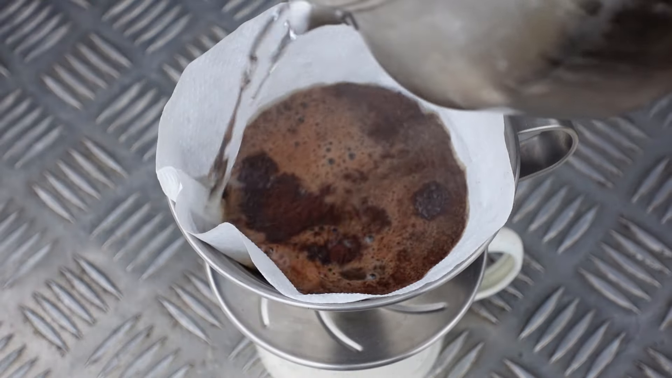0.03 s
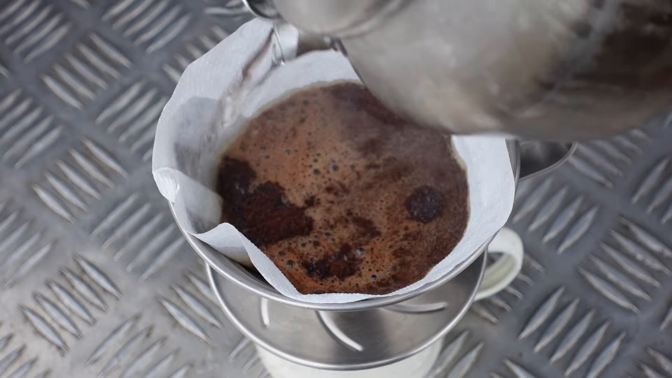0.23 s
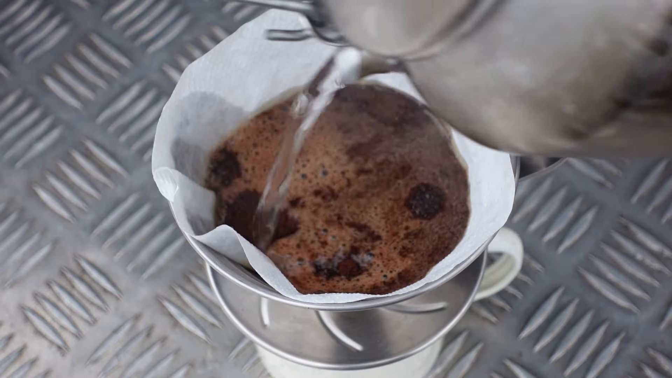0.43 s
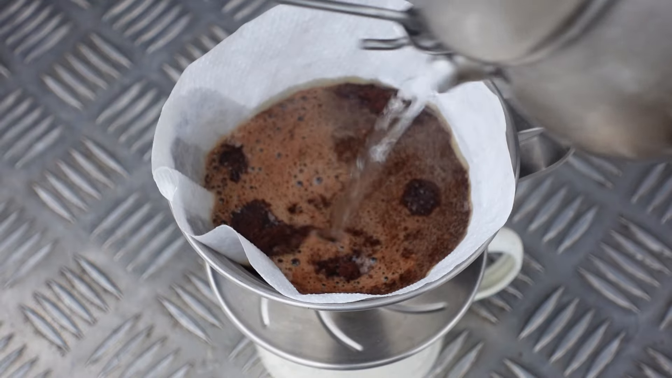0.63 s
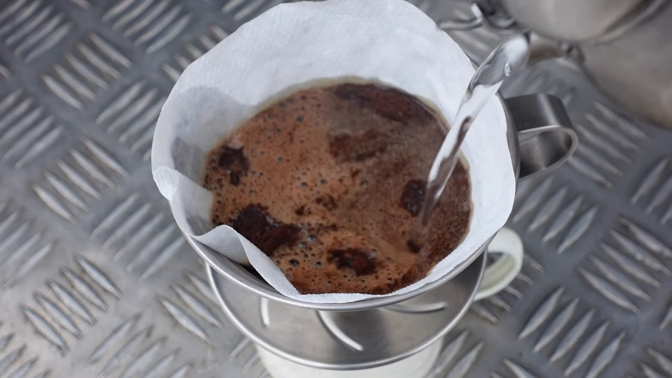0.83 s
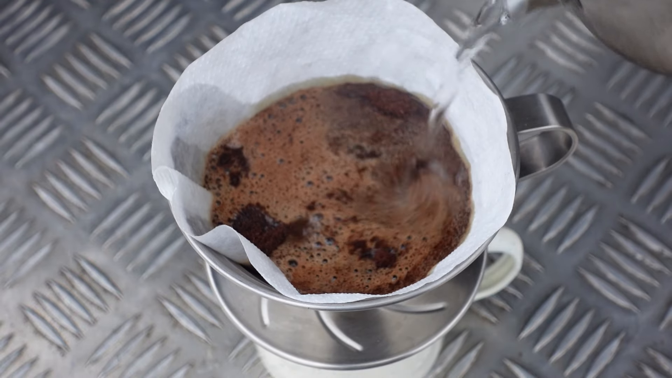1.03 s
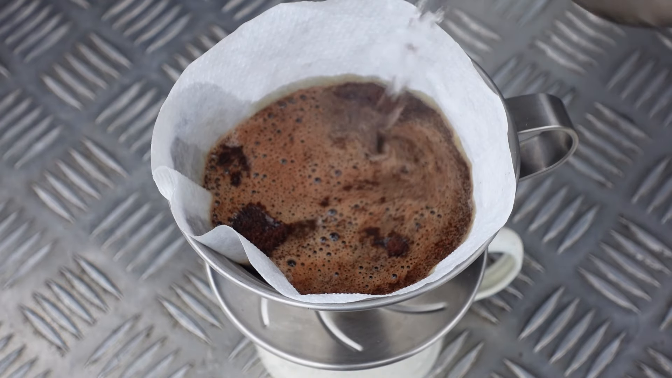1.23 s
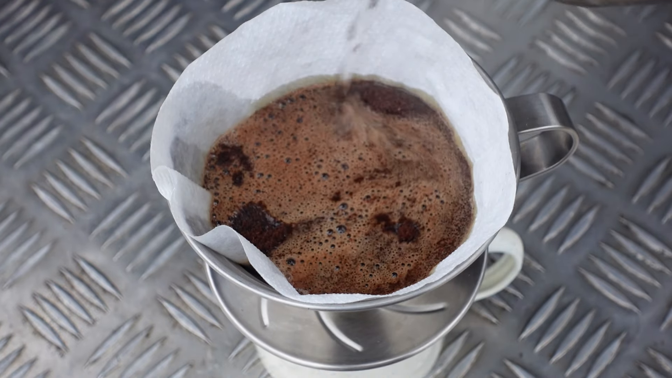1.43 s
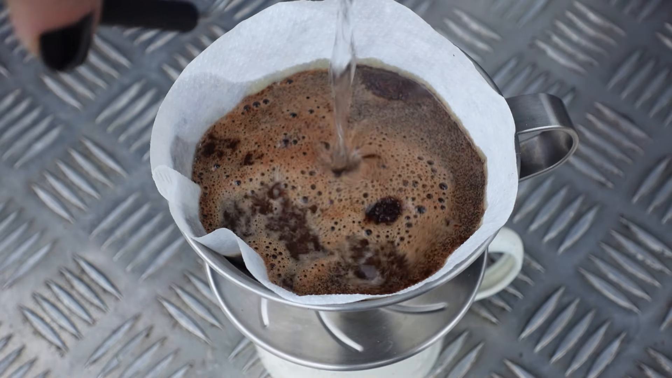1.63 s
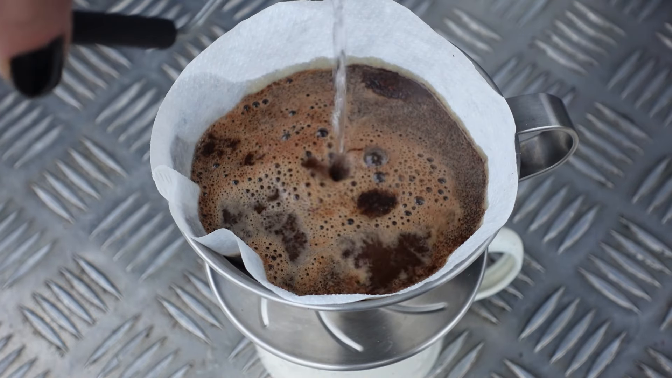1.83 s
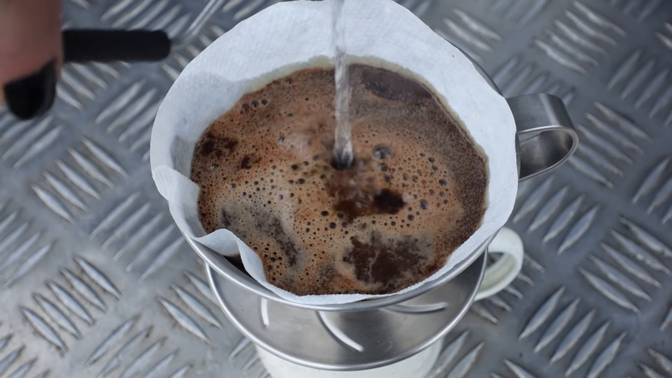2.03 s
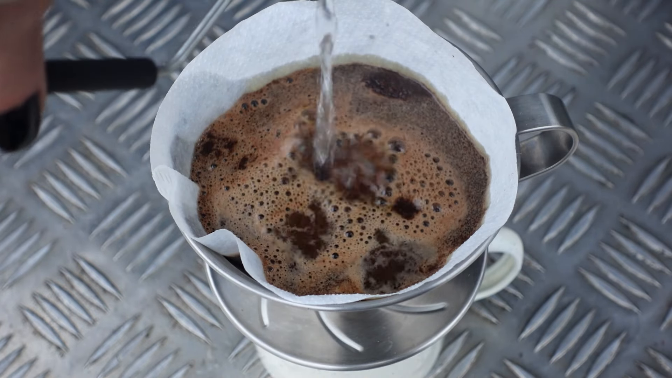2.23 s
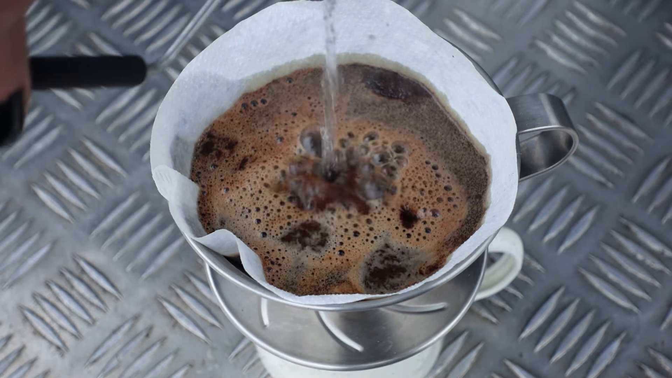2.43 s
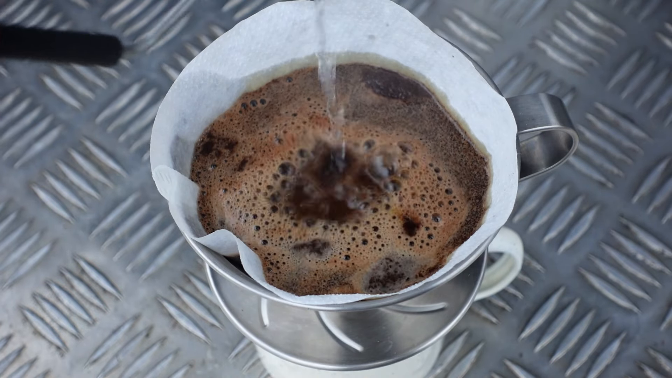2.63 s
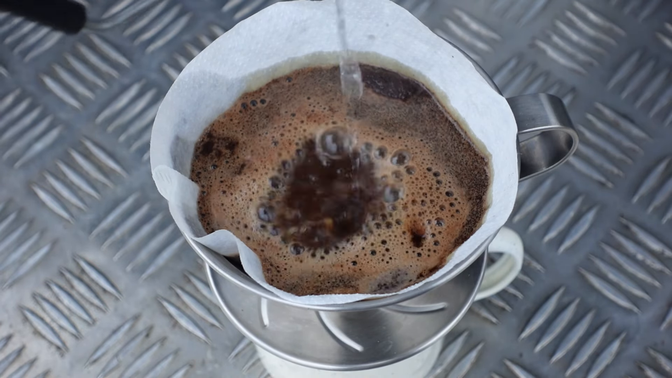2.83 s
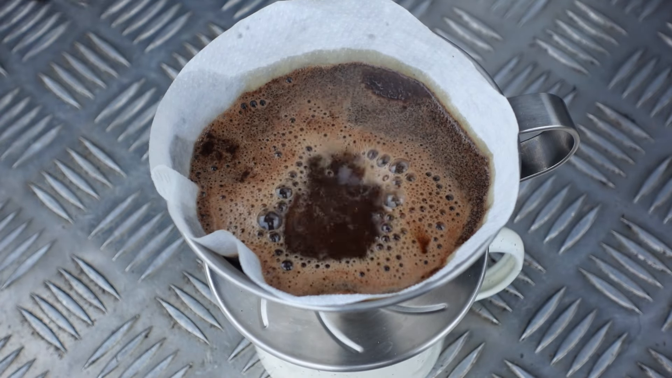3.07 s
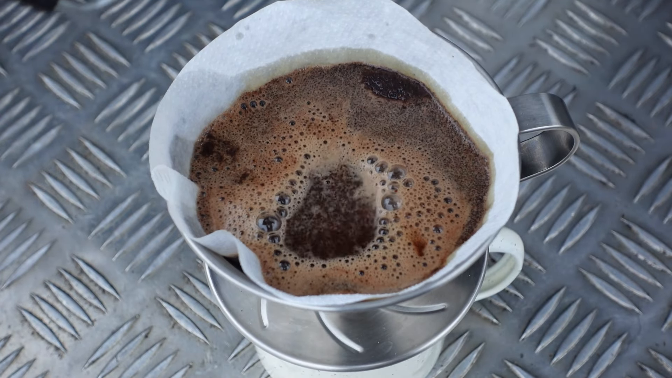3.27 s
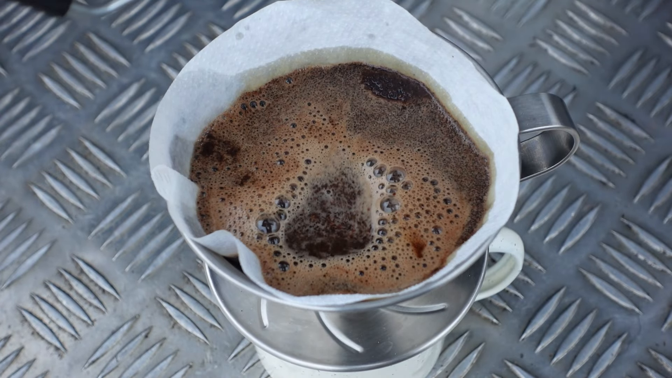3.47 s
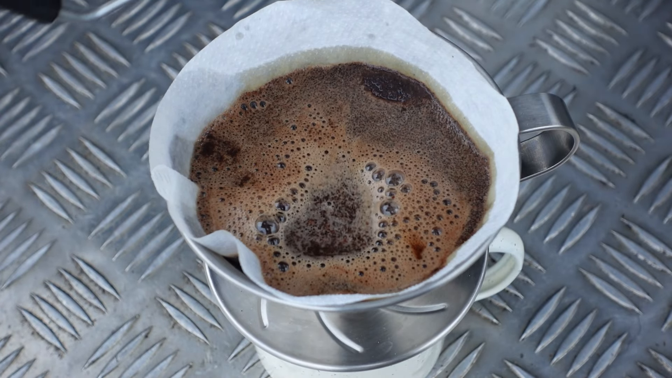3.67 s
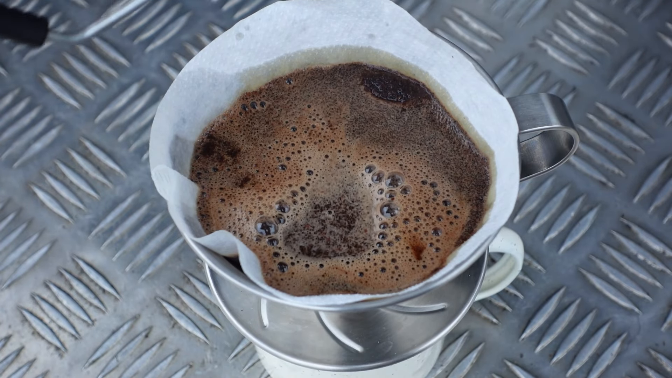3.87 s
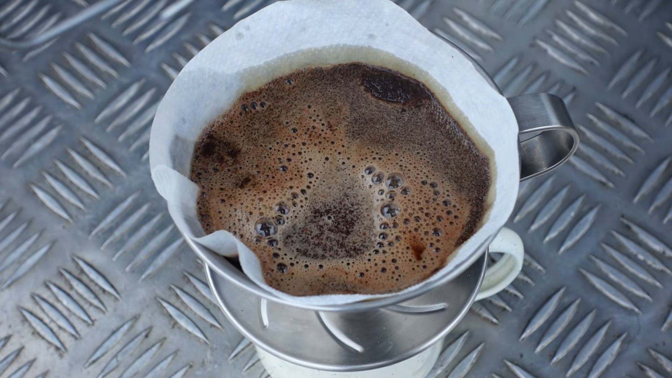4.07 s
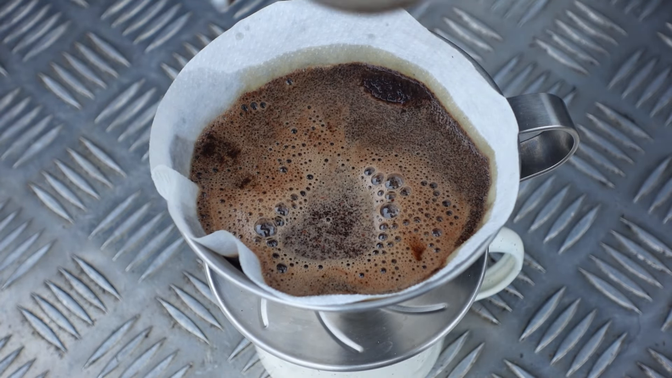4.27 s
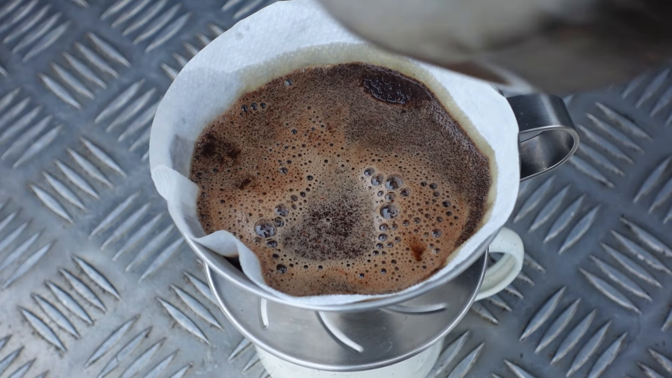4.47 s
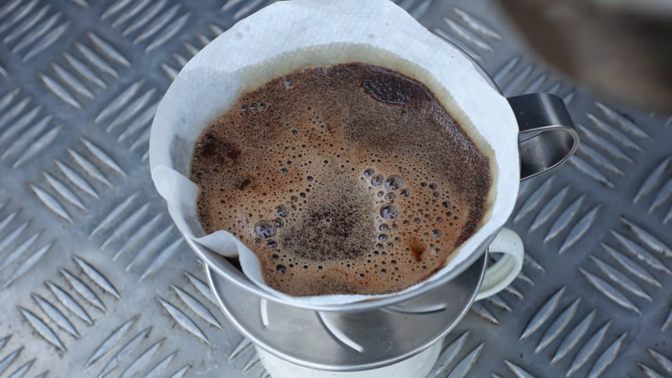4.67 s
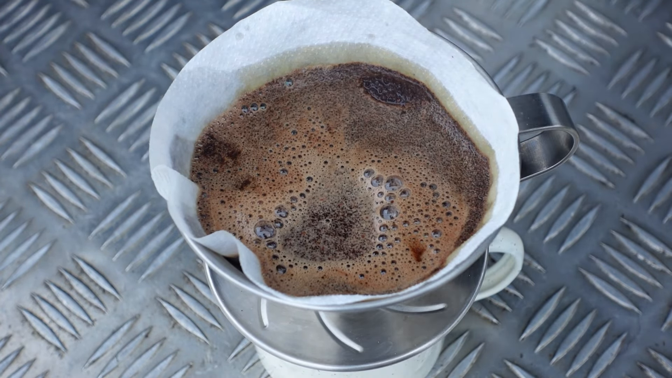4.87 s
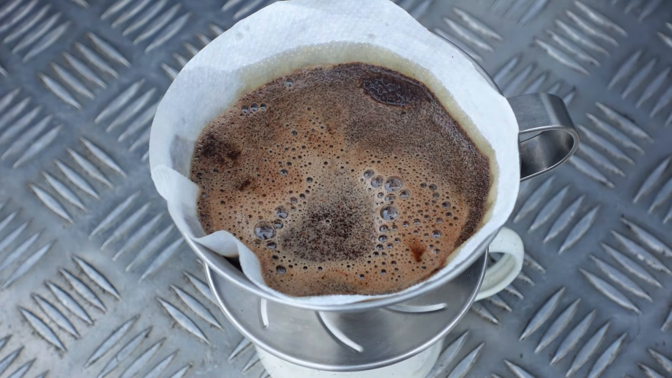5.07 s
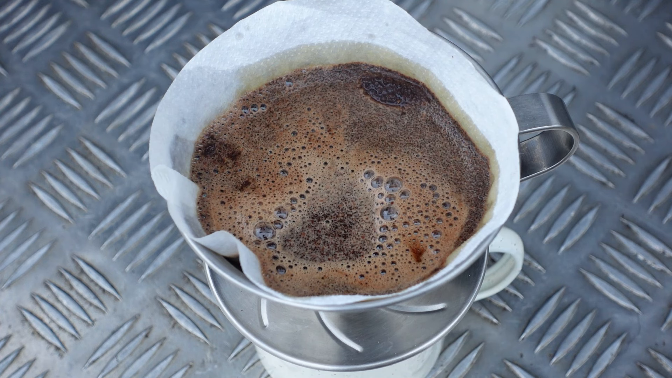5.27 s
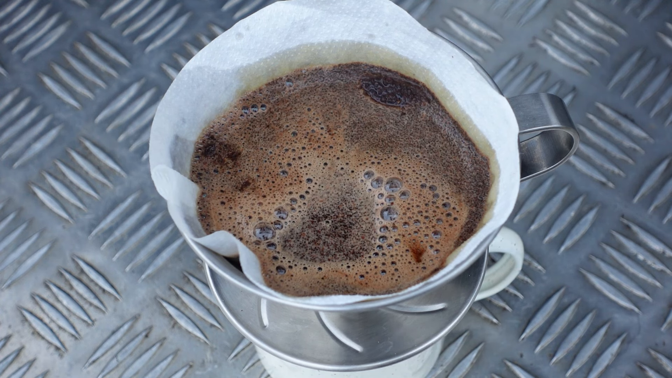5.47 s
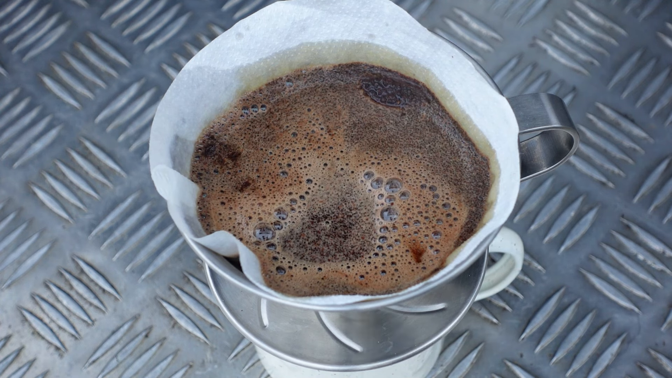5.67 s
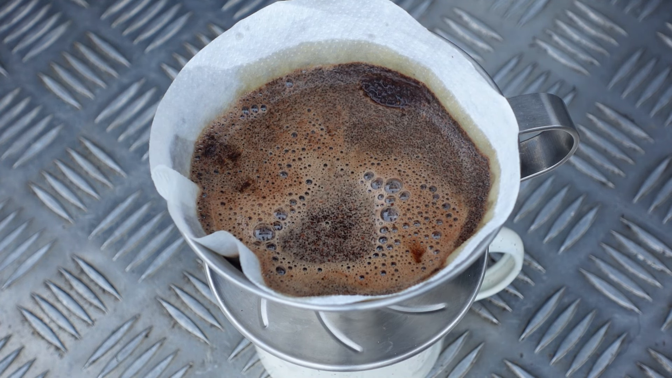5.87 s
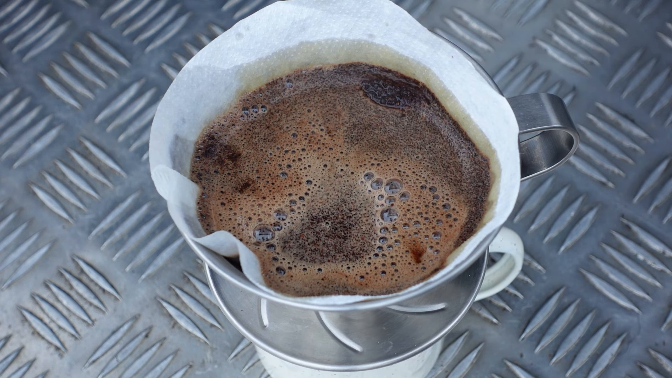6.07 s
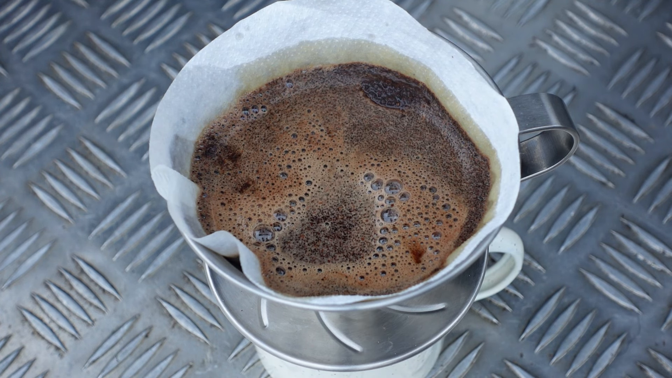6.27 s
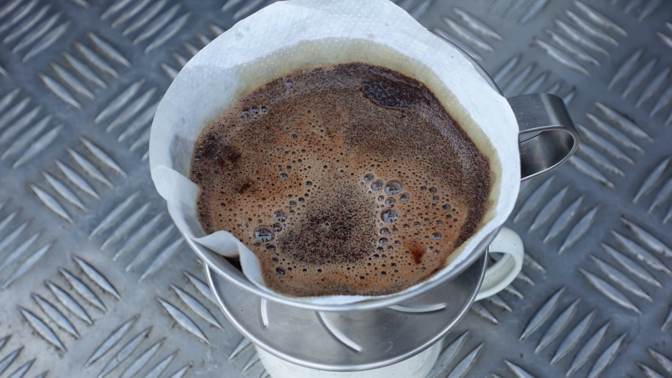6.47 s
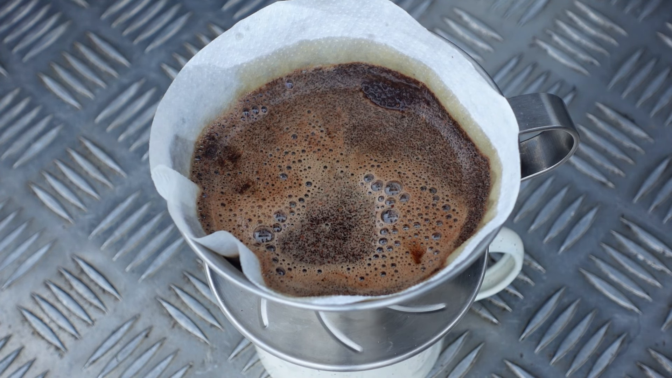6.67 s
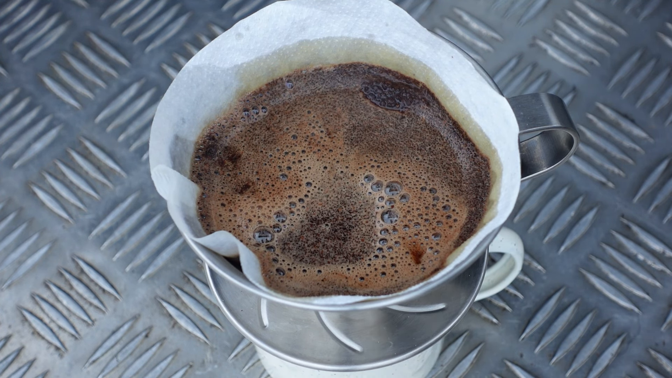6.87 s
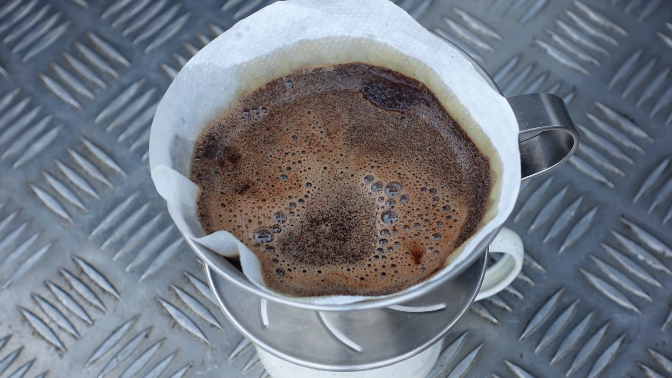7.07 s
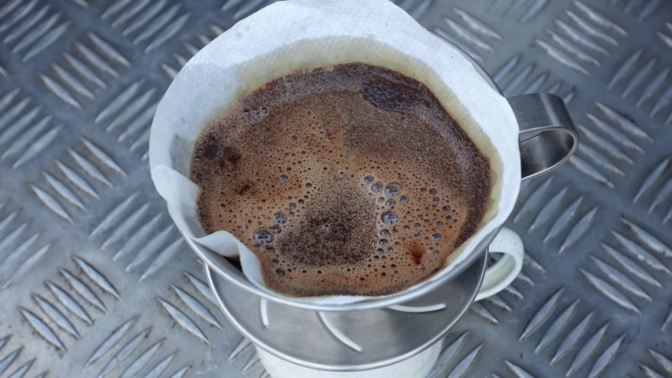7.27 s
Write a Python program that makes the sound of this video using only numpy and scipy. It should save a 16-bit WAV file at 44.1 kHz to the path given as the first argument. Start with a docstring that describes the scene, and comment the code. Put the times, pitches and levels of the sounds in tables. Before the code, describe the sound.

Thin kettle metal ticks, hot water splats and gurgles onto wet coffee grounds, a loose handle clinks, then the kettle clanks down on a metal plate.

```python
"""A kettle's thin wall ticks as it tilts; then hot water breaks up and splats on coffee grounds outdoors.
The loose handle clinks during the pour and after it; a sleeve rustles, and the handle drops with a hollow knock.
Then the kettle is set down on a metal plate: it clanks, scrapes and settles, and a lid gives a short tap.
Dying tones make the metal and bubbles; shaped noise makes most of the water, the cloth and the scraping.
Fine fizz, faint outdoor noise and a low rumble of stream and microphone air lie under it all."""
import sys
import numpy as np
from scipy import signal
from scipy.fft import rfft, irfft, next_fast_len
from scipy.io import wavfile
from scipy.ndimage import map_coordinates

SR = 44100
rng = np.random.default_rng(int(sys.argv[2]) if len(sys.argv) > 2 else 0)


def output_pcm(signal):
    """Save a mono or channel-first signal as 16-bit PCM at the path in sys.argv[1].

    Samples are clipped to [-1, 1] before scaling.
    """
    pcm = np.clip(np.atleast_2d(signal).T, -1, 1) * 32767
    wavfile.write(sys.argv[1], SR, np.round(pcm).astype(np.int16))


N = 322371  # length in samples
T = np.arange(SR // 2) / SR  # half a second of time, enough for one short sound
# "t60" below is the time in seconds that a sound takes to fade by 60 dB.
# "Relative dB" means that the function playing the table still shifts the level.


def amp(db):
    """Decibels to gain."""
    return 10 ** (np.asarray(db) / 20)


def unit(x):
    """Scale to an average strength (rms) of 1."""
    return x / np.sqrt(np.mean(x ** 2) + 1e-20)


def along(points, hz):
    """Read a curve of (Hz, value) points, joined on a log frequency axis."""
    f, v = np.transpose(points)
    return np.interp(np.log(hz + 1), np.log(f + 1), v)


def levels(rows):
    """A gain per sample for each dB column; near silence outside the rows."""
    s, *cols = np.transpose(rows)
    return [amp(np.interp(np.arange(N) / SR, s, c, left=-120, right=-120)) for c in cols]


def swells(rows, drop_db=8, power=1.62):
    """Gain curves that rise and fall around each row's peak; overlapping swells add in power.

    Each is drop_db down one rise before its peak and one fall after; power rounds its top."""
    t = np.arange(0, N, 64) / SR
    rows = np.array(rows)
    peak, rise, fall = rows.T[:3, :, None]
    away = np.maximum((peak - t) / rise, (t - peak) / fall)
    shape_db = -drop_db * np.abs(away) ** power
    gains = [np.linalg.norm(amp(db[:, None] + shape_db), axis=0) for db in rows.T[3:]]
    return [np.interp(np.arange(N) / SR, t, gain) for gain in gains]


def wobble(rate):
    """A smooth random curve with the given number of knots a second."""
    return map_coordinates(rng.standard_normal(int(N * rate / SR) + 4), [np.arange(N) * rate / SR])


def uneven(span, per_s):
    """Times across a span, each falling anywhere within its own turn."""
    turns = np.arange(*span, 1 / per_s)
    return turns + rng.random(len(turns)) / per_s


def filtered(x, response):
    """Shape x by a response that depends on frequency."""
    m = next_fast_len(len(x) + 8192)
    return irfft(rfft(x, m) * response(np.fft.rfftfreq(m, 1 / SR)), m)[:len(x)]


def coloured(x, spectrum):
    """Shape x by a spectrum of (Hz, dB) points, at rms 1."""
    return unit(filtered(x, lambda hz: amp(along(spectrum, hz))))


def grains(rate, spread_db):
    """Random tiny impacts of uneven size, about rate a second, at rms 1."""
    struck = rng.random(N) < rate / SR
    return unit(struck * rng.standard_normal(N) * amp(spread_db * rng.standard_normal(N)))


def ring(hz, db, t60):
    """One dying tone."""
    return amp(db - 60 * T / t60) * np.sin(2 * np.pi * hz * T)


def burst(lo_hz, hi_hz, t60):
    """A dying puff of noise in a band."""
    edges = np.clip([lo_hz, hi_hz], 20, SR / 2 - 100)
    band = signal.butter(2, edges, "band", fs=SR, output="sos")
    noise = unit(signal.sosfilt(band, rng.standard_normal(len(T))))
    return noise * amp(-60 * T / t60)


def pop(hz, cycles):
    """A pressure flick of a cycle or so, peaking 1 ms in."""
    u = (T - 1 / 1000) * hz
    return -np.cos(2 * np.pi * u) * np.exp(-np.abs(2 * u / cycles) ** 2)


def add(track, s, sound):
    """Mix a sound in at time s."""
    part = track[max(round(s * SR), 0):][:len(sound)]
    part += sound[:len(part)]


# Swells of low rumble, from the pouring stream and from air on the microphone.
# Each row: peak time, rise and fall in seconds, level in relative dB.
RUMBLE_SWELLS = [(1.73, .09, 0.26, -42), (2.2, .3, .5, -45), (3.0, 0.66, 0.35, -42),
                 (3.34, 0.081, .08, -35), (3.95, 0.5, 0.61, -49), (4.83, .04, 0.12, -42),
                 (6.13, .05, .2, -39.5), (6.37, 0.037, 0.09, -31), (6.6, 0.17, 0.19, -40.5),
                 (7.3, 0.069, 0.15, -40)]
# Tone of the low rumble. Each row: frequency in Hz, level in relative dB.
RUMBLE_TONE = [(10, 1.5), (28, 1), (48, -1.5), (75, -5.5), (130, -9), (220, -15), (500, -56)]
# Tone of the distant wash. Each row: frequency in Hz, level in relative dB.
FAR_TONE = [(24, -42), (40, 1), (91, -10), (130, -4), (185, -3.5), (363, -1.5), (491, -4.5), (1240, -6.5),
            (1520, -11), (2910, -19), (3930, -24), (7000, -30), (14500, -38), (16000, -44)]


def outdoors(floor_db=-57, rumble_db=-1, far_db=-50, hum_hz=140, hum_db=-60):
    """Low rumble, from the stream and air on the microphone, over a distant wash and a faint, wavering hum."""
    swell = np.hypot(amp(floor_db), swells(RUMBLE_SWELLS)[0])  # never quieter than the floor
    rumble = amp(rumble_db) * swell * coloured(rng.standard_normal(N), RUMBLE_TONE)
    far_drift = amp(0.9 * wobble(3))
    far = amp(far_db) * far_drift * coloured(rng.standard_normal(N), FAR_TONE)
    hum_drift = amp(2.5 * wobble(1.4))
    hum_phase = 2 * np.pi * hum_hz * np.arange(N) / SR + 0.7 * wobble(7.2)
    return rumble + far + amp(hum_db) * hum_drift * np.sin(hum_phase)


# How freely the wet grounds fizz. Each row: time in seconds, level in relative dB.
FIZZ_LEVEL = [(0, 0.5), (1.0, -5), (1.6, -3.5), (1.75, -4), (2.8, -2), (2.95, -9.5), (4.6, -11), (7.31, 4)]


def foam(fizz_db=-59):
    """The wet grounds fizz as countless tiny pops, fainter after the pour and stronger towards the end."""
    wetting, = levels(FIZZ_LEVEL)
    tone = [(700, -15), (1500, 2.5), (2600, 1.5), (4000, -2), (5500, -4.5), (7200, -1.5),
            (9500, -13.0), (13000, -11.5), (16000, -21)]  # (Hz, relative dB)
    flutter = amp(2.8 * wobble(23))
    return amp(fizz_db) * flutter * wetting * coloured(grains(600, 5), tone)


# Sleeve strokes. Each row: peak time, rise and fall in seconds, rustle and brushing in relative dB.
SLEEVE_STROKES = [(3.95, 0.18, 0.29, -49, -69), (4.48, .22, 0.58, -47, -54.5),
                  (4.865, 0.044, 0.13, -30, -50), (5.03, 0.055, 0.12, -37, -45),
                  (5.42, 0.14, 0.13, -33, -42), (5.6, 0.091, 0.16, -35, -44),
                  (5.83, 0.099, 0.084, -48.5, -51.5), (6.03, 0.031, 0.024, -33, -50),
                  (6.62, 0.059, 0.083, -38, -45), (6.79, 0.099, 0.074, -43.5, -53),
                  (7.07, .17, 0.11, -38.5, -44.5)]
# Tone of the rustling cloth. Each row: frequency in Hz, level in relative dB.
CLOTH_TONE = [(60, -32), (110, -32), (165, -7.5), (260, -6), (360, -2.5), (430, 3), (540, -1.5), (880, 1),
              (1350, 0), (2000, -1), (3000, -7), (4500, -17.5), (7000, -22.5), (13000, -54)]
# Tone of the fine brushing. Each row: frequency in Hz, level in relative dB.
BRUSH_TONE = [(2000, -5), (4000, 0), (5500, -2.5), (8000, -4.5), (10000, -11.5), (14000, -16), (16000, -30)]


def sleeve(rustle_db=-1, brush_db=-2, crease_db=-5.5):
    """Cloth slides in strokes: fine fibres hiss, and folds catch and crinkle unevenly."""
    rustle, brush = swells(SLEEVE_STROKES)
    surge = amp(1.07 * wobble(35))
    fibres = sum(coloured(grains(4000, 1.2), CLOTH_TONE) * amp(2.5 * wobble(60)) for _ in range(2))
    creases = amp(crease_db) * coloured(grains(170, 2), CLOTH_TONE)
    rustling = amp(rustle_db) * rustle * (unit(fibres) + creases)
    brushing = amp(brush_db) * brush * coloured(grains(9000, 1.3), BRUSH_TONE)
    return surge * (rustling + brushing)


# Dry snaps of drops and creasing cloth. Each row: time in seconds, snap in dB, edge in relative dB.
DRY_SNAPS = [(0.5668, -24, -32), (0.6003, -24, -37), (0.6257, -30, -26.5), (1.3176, -25, -50),
             (1.334, -27, -55), (1.3566, -26, -46), (3.021, -30, -30), (3.3449, -25, -55),
             (4.8727, -5.5, -40), (4.9987, -10, -39), (5.54, -17, -42), (6.036, -13, -39),
             (6.916, -20.5, -36)]


def snaps(snap_hz=1610, scatter=0.096, edge_db=-8, body_db=-16):
    """Single flicks of pressure with no ring, each with a short puff of noise."""
    out = np.zeros(N)
    for s, db, edge in DRY_SNAPS:
        hz = snap_hz * np.exp(scatter * rng.standard_normal())
        add(out, s - 0.001, amp(db) * pop(hz, cycles=0.97))
        crisp = amp(edge + edge_db) * burst(2300, 12000, 0.0087)
        dull = amp(db + body_db) * burst(460, 2800, 0.0081)
        add(out, s - 0.0003, crisp + dull)
    return out


# The lid's tones. Each row: frequency in Hz, level in relative dB, t60 in seconds.
LID_TONES = [(940, -2, .062), (1443, -6, .08), (1793, 0, .042), (2143, -7, .064), (2540, -3.5, .076),
             (4070, -13, .04), (5044, -8.5, 0.037)]


def lid(start_s=6.5627, level_db=-27.5):
    """The lid rings briefly, in several dying tones, as the hand lets go."""
    out = np.zeros(N)
    tones = sum((-1) ** k * ring(*tone) for k, tone in enumerate(LID_TONES))
    add(out, start_s, amp(level_db) * tones)
    return out


# Single short notes, of bubbles and of a clink's low ring.
# Each row: start in seconds, starting pitch in Hz, level in dB, t60 in seconds.
SHORT_NOTES = [(.651, 394, -32, 0.028), (0.881, 1340, -40, 0.033), (1.105, 2060, -36, 0.027),
               (1.3705, 3060, -27.5, 0.021), (2.4927, 2940, -29, .02), (2.498, 3700, -34.5, 0.023),
               (4.187, 1190, -35, 0.034), (4.19, 414, -41.5, 0.22), (4.252, 420, -39, 0.11)]


def short_notes(glide_per_s=0.73):
    """Dying tones, of bubbles and of a clink's low ring; each climbs slightly in pitch."""
    out = np.zeros(N)
    for s, hz, db, t60 in SHORT_NOTES:
        add(out, s, ring(hz * (1 + glide_per_s * T / 2), db, t60))
    return out


# Ticks of the wall. Each row: time in seconds, note in dB, force at middle and high pitch in relative dB.
WALL_TICKS = [(0.138, -37, -50, -61), (0.357, -43, -48, -70), (0.467, -34.5, -43, -46),
              (0.494, -36.5, -42, -55), (0.626, -29, -40, -40), (0.717, -30.5, -33, -61),
              (0.819, -41, -36, -44), (0.95, -39, -44, -63), (0.988, -34.5, -30, -35.5),
              (1.076, -41, -37, -52), (1.12, -31, -33, -56), (1.199, -37, -27, -38.5),
              (1.284, -43, -38, -46), (1.372, -34, -32, -31.5), (1.42, -35.5, -33, -27)]
# Overtones of the wall. Each row: pitch in Hz before it shifts, level in relative dB, t60 in seconds.
WALL_OVERTONES = [(1875, -2, 0.035), (2810, -12, 0.034), (3010, -5, 0.018), (3916, -0.5, 0.043),
                  (5270, -10.5, 0.031), (5400, -23, .04), (6600, -33, .04), (7600, -21, 0.069)]


def ticks(note_hz=1206, sag_hz_per_s=66.4, note_t60=0.14, overtone_db=-3, contact_db=-11,
          wall_note_hz=1140):
    """The tilting wall rings a note that sinks as the water shifts; its overtones sink half as fast."""
    out = np.zeros(N)
    for s, db, middle, high in WALL_TICKS:
        hz = note_hz - sag_hz_per_s * s
        shift = (hz / wall_note_hz) ** 0.5
        force = [(2800, middle), (3900, high)]
        overtones = 0
        for f, level, t60 in WALL_OVERTONES:
            detune, luck_db = rng.standard_normal(2) * [0.005, 2]
            overtones += ring(f * (shift + detune), level + along(force, f) + luck_db, t60)
        contact = amp(high + contact_db) * burst(1400, 4100, 0.052)
        add(out, s, ring(hz, db, note_t60) + amp(overtone_db) * overtones + contact)
    return out


# Average force of the faint jiggles: low, middle and high pitch, in relative dB.
JIGGLE_FORCE = (-36, -40, -52.5)


def jiggles(span_s=(3.7, 4.53), per_s=13, scatter_db=3):
    """Random faint contacts of the handle while the kettle is carried, as extra clink rows."""
    times = uneven(span_s, per_s)
    luck_db = scatter_db * rng.standard_normal((len(times), 3))
    return [(s, *(np.array(JIGGLE_FORCE) + db)) for s, db in zip(times, luck_db)]


# Rattles of the handle in its lugs.
# Each row: time in seconds, force at low, middle and high pitch in relative dB.
HANDLE_CLINKS = [(2.02, -22, -35, -54), (2.054, -26.5, -28, -45), (2.25, -16, -31, -53),
                 (2.352, -14.5, -49, -54), (2.986, -24, -43, -44), (3.011, -27.5, -19.5, -47),
                 (3.02, -28.5, -32, -54), (3.056, -24.5, -50, -62), (3.144, -25, -32, -40.5),
                 (3.199, -32.5, -40, -52), (3.24, -27, -34, -56), (3.582, -34.5, -33, -68),
                 (3.757, -33, -34, -50), (3.947, -29.5, -33, -51), (4.081, -25.5, -40, -58),
                 (4.222, -38.5, -42, -36.5), (4.408, -40, -34, -49), (4.542, -26.5, -40, -40),
                 (4.596, -22.5, -31, -48), (5.207, -27.5, -27.5, -55), (5.872, -35, -54, -35.5)]
# The handle's tones. Each row: average pitch in Hz, level in relative dB, average t60 in seconds.
HANDLE_TONES = [(415, -15, 0.076), (908, -1.5, 0.055), (1450, -1.5, 0.036), (1602, 0, 0.022),
                (2030, -8, 0.016), (2680, -17, 0.037), (3029, -2.5, 0.055), (4910, 0, 0.027),
                (5570, -15, 0.043), (7110, -4.5, 0.038), (7920, -9, .06), (11600, -11, 0.037)]


def clinks(ring_db=-5, contact_db=-8.5):
    """The loose handle rings; harder contacts reach its higher tones, and the hand damps each differently."""
    out = np.zeros(N)
    for s, low, middle, high in HANDLE_CLINKS + jiggles():
        force = [(1600, low), (2700, middle), (5000, high)]
        tones = 0
        for k, (hz, db, t60) in enumerate(HANDLE_TONES):
            detune, luck_db, grip = rng.standard_normal(3) * [0.012, 3, 0.25]
            level = db + along(force, hz) + luck_db
            tones += (-1) ** k * ring(hz * (1 + detune), level, t60 * np.exp(grip))
        contact = amp(low + contact_db) * burst(990, 1900, 0.025)
        add(out, s, amp(ring_db) * tones + contact)
    return out


# Hollow tones of the handle falling against the kettle.
# Each row: frequency in Hz, level in dB, t60 in seconds.
HOLLOW_TONES = [(167.4, -18.5, 0.12), (200, -13, 0.037), (328, -15, 0.031), (401, -18.5, 0.091),
                (740, -8, 0.007), (1145, -8, 0.013), (1470, -26, 0.052), (1710, -33, 0.069),
                (2220, -26, 0.073), (3070, -40, 0.098), (5400, -37, 0.044), (7117, -45, .07),
                (8930, -36, 0.053)]


def knock(start_s=4.6785, clack_db=-21, edge_db=-31, tail_db=-40):
    """The handle falls against the kettle: a hand-damped, hollow blow with a hard edge."""
    out = np.zeros(N)
    add(out, start_s, sum(ring(*tone) * (-1) ** k for k, tone in enumerate(HOLLOW_TONES)))
    add(out, start_s, amp(clack_db) * burst(1260, 2740, 0.035))
    add(out, start_s, amp(edge_db) * burst(3400, 11500, 0.028))
    add(out, start_s, amp(tail_db) * burst(200, 2100, 0.14))
    return out


# Slides of the base over the plate.
# Each row: peak time, rise and fall in seconds, level in relative dB.
BASE_SLIDES = [(6.11, 0.037, 0.07, -31.5), (6.205, .065, .04, -26.5), (6.35, 0.11, 0.085, -31)]
# Tone of the scraped plate. Each row: frequency in Hz, level in relative dB.
GRIT_TONE = [(100, -24), (200, -5), (400, 5.5), (620, -4.5), (900, 2.5), (1350, 2.5), (1700, -5.5),
             (3000, -11.5), (5000, -21), (8000, -25), (16000, -46)]


def scrape(grit_db=-1, sing_db=-10, sing_tilt=0.39):
    """The base catches in tiny jerks that sound the plate and stir the kettle's tones, damped by contact."""
    slide, = swells(BASE_SLIDES)
    catches = grains(6000, 2) * amp(1.6 * wobble(130))

    def body(f):
        """The kettle's resonances as a response to frequency f."""
        return sum(amp(db) * (hz / 1000) ** sing_tilt / (1 + 1j * (f - hz) * t60 / 4)
                   for hz, t60, db, _ in BODY_TONES)

    grit = amp(grit_db) * coloured(catches, GRIT_TONE)
    return slide * (grit + amp(sing_db) * unit(filtered(catches, body)))


# The plate's crowded tones. Each row: frequency in Hz, level in relative dB, t60 in seconds.
PLATE_TONES = [(40, -13, 0.37), (110, -21, .4), (184, 0.5, 0.47), (407, 0.5, 0.37), (665, -3.5, 0.21),
               (900, 4, 0.13), (1420, -1.5, 0.049), (1900, -11.5, 0.1), (3700, -14.5, 0.024),
               (8000, -26, 0.09), (16000, -64, .06)]


def plate():
    """The plate's dense ring is noise in which each frequency dies at its own speed."""
    noise = coloured(rng.standard_normal(len(T)), [(hz, db) for hz, db, _ in PLATE_TONES])
    hz, t, z = signal.stft(noise, SR, nperseg=256)
    t60 = along([(f, fade) for f, _, fade in PLATE_TONES], hz)
    return signal.istft(z * amp(-60 * t / t60[:, None]), SR, nperseg=256)[1][:len(T)]


# The kettle meets the plate. Each row: time in seconds, ring in relative dB, rim contact from 0 to 1,
# plate in dB, thud in dB, crack in relative dB.
PLATE_BLOWS = [(4.808, -34, 0.1, -30.5, -38, -52), (6.0641, -0.5, 0, -14.5, -48, -6),
               (6.255, -21, 0, -26, -25, -52), (6.3, -9.5, 0.44, -22.5, -38, -31),
               (6.3228, -13, 0, -28, -21, -45), (6.3269, -2, 0.86, -18.5, -23, -18),
               (6.332, -14, 1, -21.5, -15, -29), (6.368, -18, 0.2, -18.5, -31, -44),
               (6.392, -21, 0.7, -33, -34, -36), (6.403, -35, 0.4, -33, -23, -35),
               (6.461, -37, 0.2, -38, -34, -46), (6.5628, -19, 0, -27.5, -33, -33),
               (7.2402, -18.5, 0.1, -39, -42, -29)]
# The kettle's body. Each row: average pitch in Hz, t60 in seconds before damping,
# level in relative dB when struck on the base, level in relative dB when struck on the rim.
BODY_TONES = [(210, .2, -25, -17), (398, .35, -21, -24), (495, .3, -29, -27), (711, .3, -30, -31),
              (925, .2, -23, -27), (1170, .16, -22, -32), (1315, .15, -23, -26), (1455, .16, -21, -28),
              (1705, .3, -30, -31), (2140, .15, -28, -35), (2460, .15, -34, -34), (2826, .24, -26, -23),
              (3080, .08, -29, -21), (3686, .24, -38, -22), (3844, .35, -40, -41), (4070, .17, -36, -42),
              (4260, .09, -34, -55), (4695, .18, -36, -44), (5060, .18, -35, -35), (5215, .12, -44, -33),
              (5665, .13, -45, -22), (6680, .13, -45, -40), (6920, .1, -43, -39), (7730, .13, -55, -37),
              (8400, .13, -51, -35), (8880, .08, -52, -32), (10150, .07, -58, -32), (11400, .08, -54, -39),
              (12500, .06, -64, -38)]


def clanks(thud_hz=190, thud_t60=0.059, clack_hz=1200, clack_db=5, bright_t60=0.024, damping=0.8):
    """The flat base lands with a clack, the rim with a bright crack; both ring the kettle and the plate."""
    out = np.zeros(N)
    for s, db, rim, plate_db, thud_db, crack_db in PLATE_BLOWS:
        body = 0
        for hz, t60, base_db, rim_db in BODY_TONES:
            # each way of resting on the plate retunes the tones a little and damps them
            detune, luck_db = rng.standard_normal(2) * [0.004, 1.5]
            level = db + base_db + rim * (rim_db - base_db) + luck_db
            body += rng.choice([-1, 1]) * ring(hz * (1 + detune), level, damping * t60)
        clack = ring(clack_hz, clack_db, 0.0091) + amp(-4.5) * burst(940, 2860, 0.03)
        crack = (1 - rim) * clack + (rim + 0.06) * burst(3500, 13000, bright_t60)
        thud = ring(thud_hz * rng.normal(1, 0.055), thud_db, thud_t60)
        add(out, s, body + amp(plate_db) * plate() + thud + amp(crack_db) * crack)
    return out


def froth(pitch_hz=1500, cycles=7, rise=0.15, count=420):
    """Small bubbles under the stream, each with its own rising note, at rms 1 while the water runs."""
    out, t = np.zeros(N), T[:SR // 50]
    start, end = STREAM_FLOW[0][0], STREAM_FLOW[-1][0]
    for s in rng.uniform(start, end, count):
        pitch, size = rng.standard_normal(2)
        hz = pitch_hz * np.exp(0.38 * pitch)
        age = t * hz / cycles
        note = np.sin(2 * np.pi * hz * t * (1 + rise * age / 2))
        add(out, s, amp(5 * size - 30 * age) * note)
    return unit(out) * np.sqrt((end - start) * SR / N)


# The stream's strength. Each row: time in seconds, gurgle in relative dB, patter in relative dB.
STREAM_FLOW = [(1.64, -67, -70), (1.705, -37.5, -43.5), (1.905, -41, -48.5), (1.94, -35.5, -59),
               (2.24, -34, -46), (2.304, -45, -49), (2.345, -34, -44.5), (2.82, -43.5, -52),
               (2.999, -52, -64)]
# Tone of the gurgle. Each row: frequency in Hz, level in relative dB.
GURGLE_TONE = [(60, -12), (150, -7.5), (260, -4), (380, 1.5), (480, -7.5), (620, -14.5), (1000, -35),
               (2000, -65)]
# Tone of the pattering droplets. Each row: frequency in Hz, level in relative dB.
PATTER_TONE = [(300, -17), (700, -14), (950, 18), (1500, -11), (2200, 10), (2800, -10), (4500, -13),
               (5700, -28), (7500, -27), (11000, -41), (16000, -32)]


def stream(gurgle_db=-5, patter_db=-3, froth_db=-2, spatter_db=-13):
    """The cone gurgles, droplets patter, small bubbles ring and fine spatter hits the paper."""
    gurgle, patter = levels(STREAM_FLOW)
    gurgling = amp(gurgle_db) * gurgle * coloured(grains(500, 2.8), GURGLE_TONE)
    droplets = coloured(grains(900, 4) * amp(3 * wobble(45)), PATTER_TONE)
    paper = [(3000, -29), (4600, 4), (5700, -18), (6900, 4), (8000, 1), (9800, -19),
             (12000, -12), (16000, -5)]  # (Hz, relative dB)
    spatter = coloured(grains(350, 3), paper)
    drops = amp(patter_db) * droplets + amp(froth_db) * froth() + amp(spatter_db) * spatter
    return gurgling + patter * drops


def small_lumps(span_s=(1.74, 2.89), per_s=52, slap_over_gurgle_db=12.5, size_scatter_db=2.5,
                spray_db=-15.5, spray_scatter_db=6, cavity_db=-7):
    """Lesser lumps break off at an uneven pace, bigger where the stream gurgles harder, as splat rows."""
    s = uneven(span_s, per_s)
    size, spray = rng.standard_normal((2, len(s)))
    times, gurgle_db, _ = np.transpose(STREAM_FLOW)
    slap = np.interp(s, times, gurgle_db) + slap_over_gurgle_db + size_scatter_db * size
    return list(zip(s, slap, slap + spray_db + spray_scatter_db * spray, slap + cavity_db))


# The biggest lumps of water to hit the slurry.
# Each row: time in seconds, slap and spray in relative dB, cavity in dB.
BIG_SPLATS = [(1.7511, -18.5, -31, -36), (1.7954, -18, -45, -36), (1.9268, -12, -28, -29),
              (1.936, -15, -42, -21), (1.957, -9, -40, -24), (1.9805, -10.5, -40, -17),
              (2.006, -6, -44.5, -18.5), (2.0564, -15, -36, -32), (2.097, -15.5, -42, -30),
              (2.113, -11.5, -21, -25.5), (2.1523, -17.5, -26, -30), (2.1712, -18, -21.5, -35),
              (2.208, -18, -22, -25), (2.2504, -14.5, -46, -28), (2.332, -18.5, -47, -23.5),
              (2.3458, -10.5, -17, -22), (2.3921, -20.5, -27, -33), (2.4262, -23, -27, -23),
              (2.4633, -14.5, -44, -33), (2.4894, -15, -50, -34), (2.5171, -12.5, -30, -36),
              (2.5397, -15.5, -33, -32), (2.5717, -14.5, -29, -34), (2.632, -9, -22, -33),
              (2.6718, -20, -26.5, -28), (2.744, -25.5, -24.5, -33), (2.8342, -25.5, -14.5, -42),
              (2.854, -27, -20, -35)]


def splats(slap_hz=1480, slap_scatter=0.09, slap_db=-1, splash_db=-15, spray_db=-7,
           cavity_hz=385, cavity_t60=0.037):
    """A lump slaps the surface and throws spray; the crater that it leaves rings low a moment later."""
    out = np.zeros(N)
    for s, slap, spray, cavity in BIG_SPLATS + small_lumps():
        hz = slap_hz * np.exp(slap_scatter * rng.standard_normal())
        add(out, s - 0.001, amp(slap + slap_db) * pop(hz, cycles=1.05))
        add(out, s - 0.0005, amp(slap + splash_db) * burst(930, 2320, 0.017))
        droplets = burst(4870, 9800, 0.0085) + amp(-5.0) * burst(1900, 12500, 0.0056)
        add(out, s - 0.0003, amp(spray + spray_db) * droplets)
        crater_hz = cavity_hz * np.exp(rng.normal(0, 0.12))
        add(out, s + 0.00228, ring(crater_hz, cavity, cavity_t60))
    return out


def surroundings(x, wet_db=-20, t60=0.26):
    """Nearby walls give a weak, short answer, made of dying noise."""
    tail = burst(200, 8800, t60) * (T > 0.003)
    return x + amp(wet_db) * signal.fftconvolve(x, tail / np.linalg.norm(tail))[:N]


def scene():
    """Everything at one close microphone; only the separate hits get an answer from the walls."""
    hits = snaps() + lid() + short_notes() + ticks() + clinks() + knock() + clanks() + splats()
    steady = outdoors() + foam() + sleeve() + scrape() + stream()
    return (surroundings(hits) + steady)[None]


def record(dry, top_hz=16000, ceiling=0.8):
    """The recorder rounds off the tallest peaks and cuts steeply above its band limit."""
    rounded = dry[0] / (1 + (dry[0] / ceiling) ** 8) ** (1 / 8)
    return filtered(rounded, lambda hz: 1 / (1 + (hz / top_hz) ** 120))[None]


dry = scene()
out = record(dry)
output_pcm(out)
```